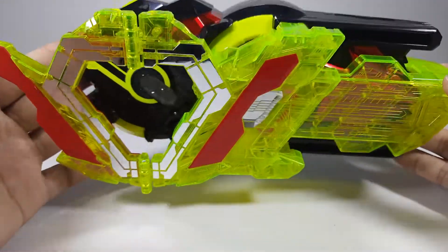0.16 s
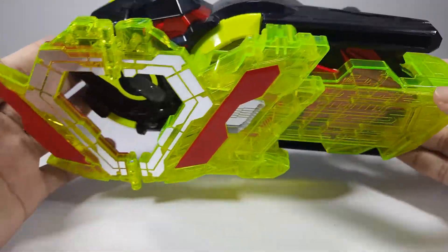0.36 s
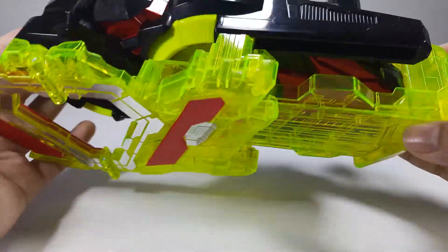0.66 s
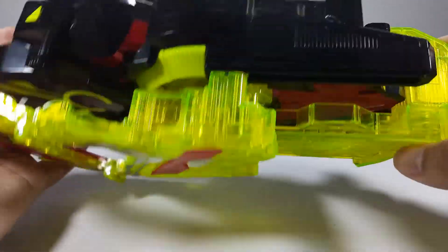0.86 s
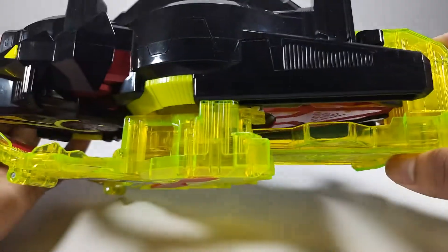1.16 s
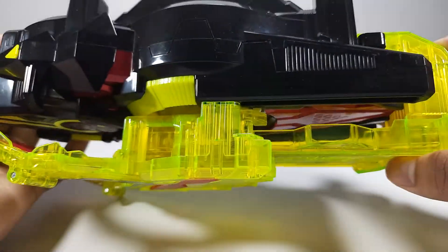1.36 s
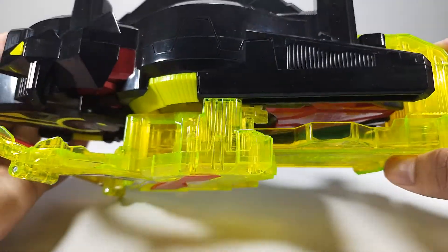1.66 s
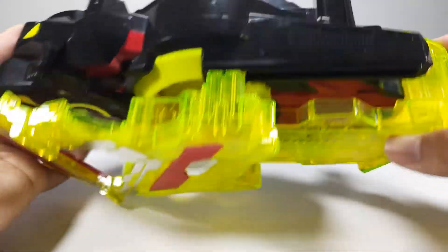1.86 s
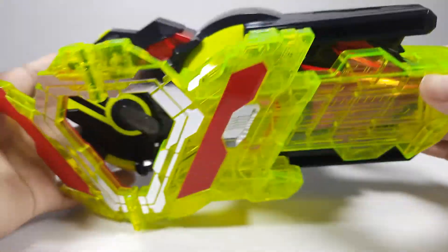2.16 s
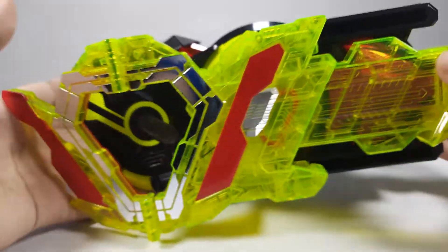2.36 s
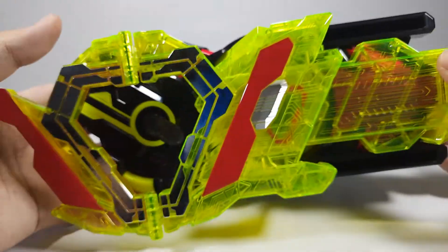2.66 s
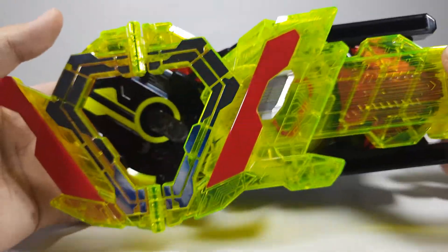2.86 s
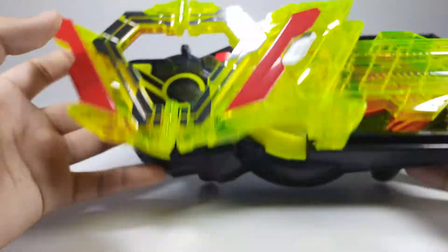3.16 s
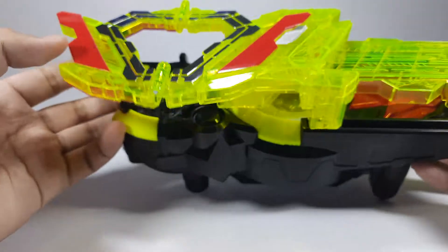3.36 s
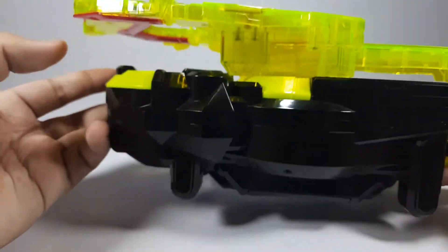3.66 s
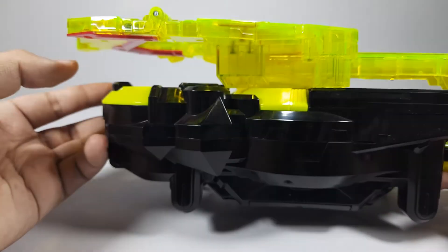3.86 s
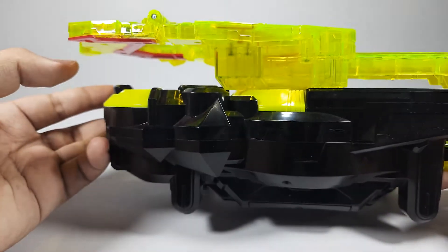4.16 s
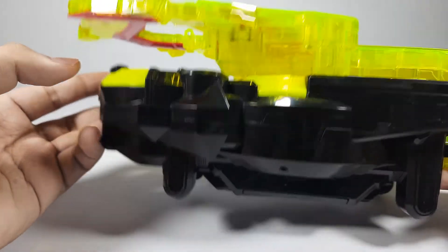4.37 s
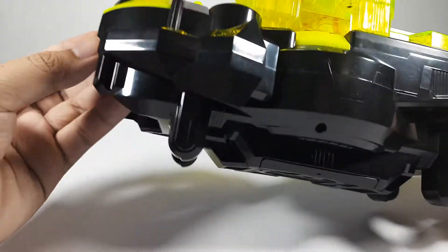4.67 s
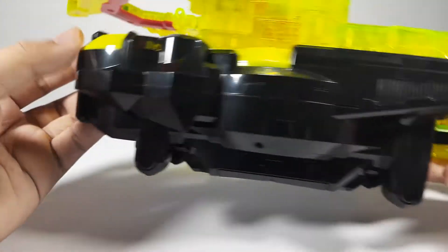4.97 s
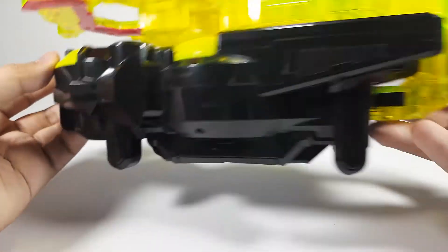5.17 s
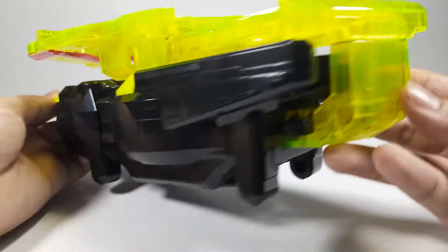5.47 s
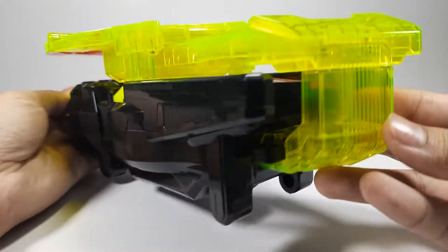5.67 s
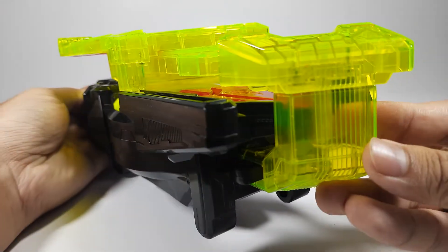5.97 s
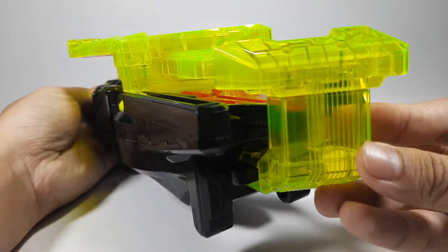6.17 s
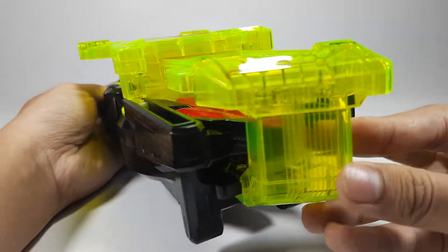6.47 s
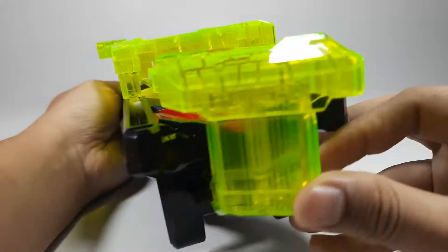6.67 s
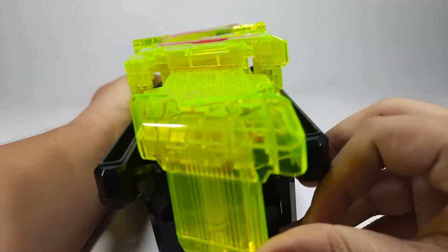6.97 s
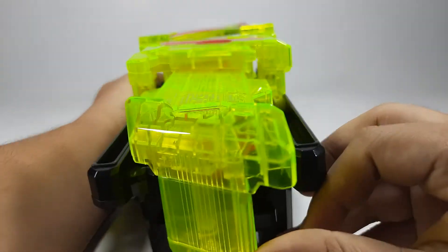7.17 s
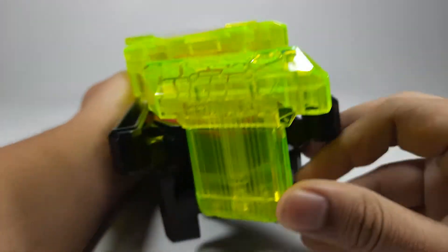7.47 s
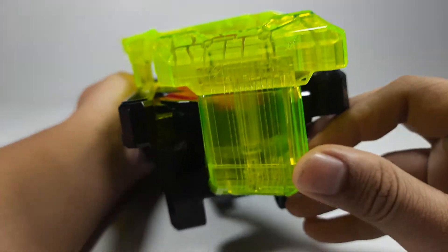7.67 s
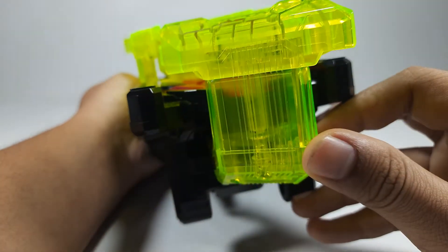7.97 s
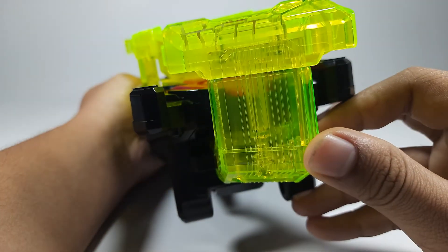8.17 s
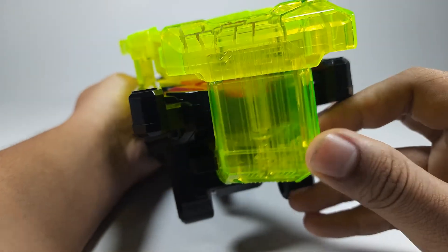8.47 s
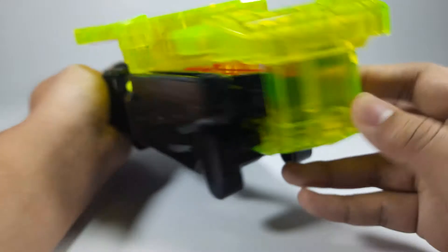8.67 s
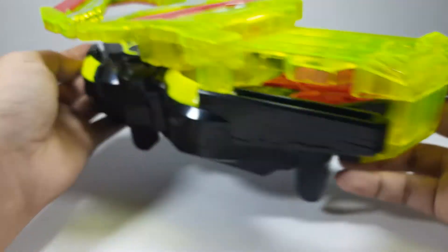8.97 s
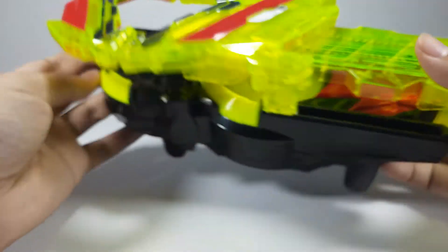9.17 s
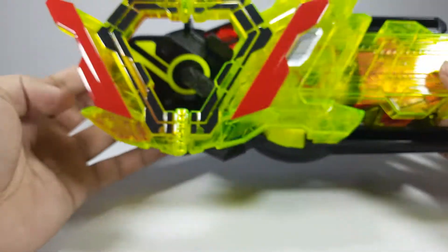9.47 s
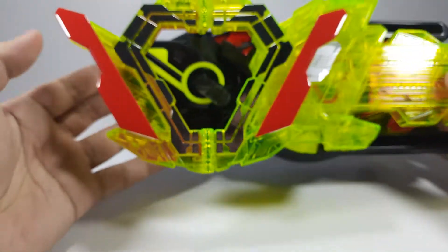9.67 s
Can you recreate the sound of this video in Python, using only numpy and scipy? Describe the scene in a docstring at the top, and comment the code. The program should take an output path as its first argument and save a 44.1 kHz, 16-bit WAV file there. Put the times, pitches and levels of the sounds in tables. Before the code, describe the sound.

A hollow plastic toy buckle is turned by hand just above a table in a small room, close to a stereo microphone. A tight cluster of sharp clacks comes near one second, a harder snap after two and a half, then light taps, a dull table thud, soft hissing slides and a final run of small rattly clicks. Low rumble and faint hiss remain beneath.

```python
"""Clicks and clacks of a hollow plastic toy belt buckle, turned by hand just above a table, near a camera.
Its shell, ribs and loose parts ring as decaying modes with noise cracks; table bumps are low decaying modes.
Shaped noise with tiny slips makes the sliding hiss and soft rubbing; resonances turn finger drag into squeaks.
The two microphones also pick up a short room tail, a low rumble, a faint hum and air hiss."""
import sys
import numpy as np
from scipy import signal
from scipy.fft import rfft, irfft, next_fast_len
from scipy.io import wavfile
from scipy.ndimage import map_coordinates

SR = 44100
rng = np.random.default_rng(int(sys.argv[2]) if len(sys.argv) > 2 else 0)


def to_wav(s):
    """Save 16-bit WAV."""
    ch = np.atleast_2d(s).T  # columns
    pcm = np.round(np.clip(ch, -1, 1) * 32767)  # PCM
    wavfile.write(sys.argv[1], SR, pcm.astype(np.int16))


N = 432621


def amp(db):
    """Decibels to gain."""
    return 10 ** (np.asarray(db) / 20)


def unit(x):
    """Scaled to rms 1."""
    return x / np.sqrt(np.mean(x ** 2) + 1e-20)


def struck(x):
    """Scaled so that the first 10 ms have rms 1."""
    return x / np.sqrt(np.mean(x[:, :SR // 100] ** 2))


def along(points, hz):
    """(Hz, value) points read on a log frequency axis."""
    f, v = np.transpose(points)
    return np.interp(np.log(hz + 1), np.log(f + 1), v)


def wobble(rate, n=N):
    """A smooth random curve of n samples, rate knots a second."""
    knots = rng.standard_normal(int(N * rate / SR) + 4)
    return map_coordinates(knots, [np.arange(n) * rate / SR])


def filtered(x, response):
    """x times a complex response of frequency."""
    n = x.shape[-1]
    m = next_fast_len(n + n // 8)
    return irfft(rfft(x, m) * response(np.fft.rfftfreq(m, 1 / SR)), m)[..., :n]


def band(x, lo_hz, hi_hz):
    """Causal band-pass."""
    edges_hz = [lo_hz, min(hi_hz, SR / 2 - 1)]
    return signal.sosfilt(signal.butter(N=3, Wn=edges_hz, btype="band", fs=SR, output="sos"), x)


def placed(pan_db):
    """Left and right gains for a level difference; positive is louder on the left."""
    return unit(amp([[pan_db / 2], [-pan_db / 2]]))


def left_first(x, lead_s):
    """The right microphone hears the sound lead_s after the left."""
    return filtered(x, lambda hz: np.exp(-2j * np.pi * np.outer([0, lead_s], hz)))


def pair(n, width):
    """Stereo white noise; width 0 is mono, 1 unrelated."""
    mid, side = rng.standard_normal((2, n))
    return np.array([mid + width * side, mid - width * side])


def add(track, start_s, sound):
    """Mixes a sound into the track at start_s."""
    part = track[:, round(start_s * SR):][:, :sound.shape[1]]
    part += sound[:, :part.shape[1]]


# spectrum of the low rumble: frequency_hz, relative_level_db_per_hz
RUMBLE_SPECTRUM = [(25, -25), (50, -9), (75, -5), (95, 3.5), (120, -9), (146, -4), (175, -13.5),
                   (220, -8.5), (255, -14), (290, -11), (400, -16), (600, -23), (900, -40), (1600, -53)]
RUMBLE_DB, RUMBLE_LEAD_S = -64, 0.00051  # the left microphone hears the room rumble and hum first
HUM_HZ, HUM_DB = 145, -72.5
HEFT_DB = 7.5  # low handling rumble over the hollow rub


def rumble(handling):
    """A deep room rumble and wavering hum lean left; the heavy toy adds low rumble as it shifts."""
    deep = lambda: unit(filtered(pair(N, 0.46), lambda hz: amp(along(RUMBLE_SPECTRUM, hz))))
    hum = np.sqrt(2) * np.sin(2 * np.pi * HUM_HZ * np.arange(N) / SR + 0.9 * wobble(5.1))
    steady = amp(RUMBLE_DB + 1.2 * wobble(4.7)) * deep() + amp(HUM_DB + 1.3 * wobble(6.4)) * hum
    heft = amp(HEFT_DB) * handling * deep()
    return placed(5.7) * left_first(steady, RUMBLE_LEAD_S) + heft


# spectrum of the background hiss: frequency_hz, relative_level_db_per_hz
AIR_SPECTRUM = [(400, -4), (700, 5), (1400, 0.5), (2500, -3.5), (6000, -13), (9000, -6.5), (12500, -13.5),
                (13500, -23.5), (15800, -31.5)]
AIR_DB = -80.5


def air():
    """The faint steady hiss of room and microphone is shaped noise."""
    hiss = unit(filtered(pair(N, 1.0), lambda hz: amp(along(AIR_SPECTRUM, hz))))
    return placed(2.3) * amp(AIR_DB) * hiss


def scuff(centre_hz, rise_s):
    """The parts graze each other for a moment before they meet: a narrow noise swelling to the hit."""
    t = np.arange(SR // 25) / SR
    grain = band(pair(len(t), 0.41), centre_hz * 1.0, centre_hz * 1.2)
    return unit(grain) * np.exp(-t[::-1] / rise_s)


# hollow shell modes, before the grip detunes them: frequency_hz, relative_level_db, t60_s, relative_linger_db
SHELL_MODES = [(437, -5, 0.11, -27.5), (590, 3, 0.015, -20), (698, -4.5, 0.062, -34),
               (770, -5.5, 0.04, -27.5), (1122, -2, 0.039, -32), (1202.6, -7, 0.045, -38),
               (1337, 4, 0.017, -37), (1560, -6.5, 0.016, -30.5), (1793, -3.5, 0.028, -32),
               (1980, -3.5, 0.023, -31.5), (2330, -8.5, 0.016, -26.5)]
GRIP_DETUNE = 0.068  # octaves: a light touch finds the modes shifted by the grip


def shell_knock(t, centre_hz, lead_s, sustain_db, focus_db, scatter_db, spread, clatter_db, detune):
    """The place of contact decides which modes of the hollow shell ring most."""
    hz, db, t60, linger_db = np.transpose(SHELL_MODES)[:, :, None]
    size, phase, skew, bend = rng.standard_normal((4, len(SHELL_MODES), 1))
    hz = hz * 2 ** (detune * bend)
    strength = amp(db + scatter_db * size - focus_db * np.log2(hz / centre_hz) ** 2)
    linger = amp(linger_db + sustain_db - 60 * t / .3)
    ring = strength * (amp(-60 * t / t60) + linger)
    angle = 2 * np.pi * hz * t + np.pi * phase
    # the nearer microphone hears it first; short waves differ most
    shift = np.pi * hz * lead_s + spread * skew * (hz / 1000) ** 2
    modes = np.array([(ring * np.sin(angle + side * shift)).sum(0) for side in (1, -1)])
    clatter = band(pair(len(t), 0.12) * amp(-60 * t / 0.086), centre_hz * 0.57, centre_hz * 1.63)
    blow = (struck(modes) + amp(clatter_db) * struck(clatter)) * (1 - np.exp(-t / 0.0003))
    # a small shell radiates little bass
    return struck(band(blow, centre_hz * 0.24, 6000))


# stiff ribs and edges, before each contact detunes them: frequency_hz, width_hz, relative_level_db
RIB_MODES = [(2470, 520, -3), (3750, 170, -5), (4300, 390, -3.5), (5100, 590, -4), (6100, 400, -6),
             (7140, 220, -9), (7900, 390, -5), (8300, 500, 6.5), (11150, 300, -10), (13200, 880, -12)]
RIB_DETUNE = 0.025  # octaves: each place of contact finds the ribs a little shifted


def rib_crack(t, lo_hz, hi_hz, t60, after_db, after_t60, attack_s):
    """A hard edge snaps through the dense rib modes; a weaker buzz of loose parts follows."""
    decay = amp(-60 * t / t60) + amp(after_db - 60 * t / after_t60)
    shape = decay * (1 - np.exp(-t / attack_s))
    shift = 2 ** (RIB_DETUNE * rng.standard_normal())

    def ribs(f):
        """Resonances over a flat floor."""
        return 0.61 + sum(amp(db / 2) * 1j * f * w / ((c * shift) ** 2 - f * f + 1j * f * w)
                          for c, w, db in RIB_MODES)

    return struck(band(filtered(pair(len(t), 0.9) * shape, ribs), lo_hz, hi_hz))


# plastic contacts, levels relative within each layer:
# start_s, knock_db, clack_db, tick_db, knock_centre_hz, left_right_db
CONTACT_HITS = [(0.163, -61.5, -83, -94, 930, 3), (0.383, -47.5, -61, -68, 903, 3),
                (0.3915, -38, -47.5, -67.5, 1050, 2), (0.396, -37.5, -52, -66, 1550, 1),
                (0.641, -71.5, -86, -92, 1190, 7), (0.841, -48.5, -53, -70, 1300, 5),
                (0.85, -52, -62, -81, 850, 4), (0.886, -46.5, -68, -89, 610, 2),
                (0.904, -53, -57, -70, 1000, 4), (0.9469, -34.5, -30.5, -21, 1530, 3),
                (0.977, -35, -43, -61, 712, 1), (0.987, -43, -34.5, -57.5, 1400, 2),
                (0.993, -41, -43, -58.5, 1702, -0.5), (1.0023, -32, -42, -60, 945, -0.5),
                (1.014, -42, -48, -63.5, 1093, 1.5), (2.048, -64, -66, -67.5, 1140, 0),
                (2.262, -68.5, -89, -96, 1285, 2), (2.361, -65.5, -91, -95, 1266, 0),
                (2.597, -52.5, -56.5, -58, 1153, -4), (2.6045, -33.5, -34, -37.5, 1420, 0),
                (2.614, -34.5, -42.5, -57, 1200, -2.5), (2.633, -37, -50, -70, 1410, -4),
                (2.6371, -23.5, -40.5, -57, 1050, 1), (2.639, -29, -23, -37, 1240, -0.5),
                (2.646, -41, -53, -60, 1150, -3), (3.075, -67, -76, -76, 1200, 3.5),
                (3.083, -67, -75, -72, 1110, 5.5), (3.259, -36, -48.5, -45.5, 1200, 1.5),
                (3.2737, -34.5, -44, -52, 1113, 4.5), (3.329, -52, -56.5, -63.5, 1098, -6),
                (3.566, -47, -52, -63, 1566, -6), (3.626, -46, -62.5, -74.5, 1155, 2),
                (3.777, -68, -64.5, -74, 995, -3.5), (3.796, -48.5, -64.5, -79, 950, 3),
                (4.43, -53.5, -80, -91, 1115, 5), (4.469, -63.5, -90, -87, 765, 1),
                (4.507, -64, -86, -88, 1200, 0), (4.54, -59.5, -81, -89.5, 1200, -0.5),
                (4.568, -52.5, -71, -76, 1090, 2), (4.573, -63.5, -66, -76.5, 1300, 4),
                (4.646, -52.5, -78.5, -83.5, 978, 2), (4.826, -68.5, -90, -95.5, 892, 3.5),
                (4.942, -60.5, -83.5, -89, 790, 4.5), (5.026, -74.5, -76.5, -82, 1515, 2.5),
                (5.156, -82.5, -83.5, -80, 1484, 2.5), (5.28, -70, -69, -78.5, 1510, 2.5),
                (5.302, -57.5, -58, -82.5, 1190, 3), (5.372, -52.5, -65, -67.5, 1470, 4),
                (5.4, -51.5, -63, -74, 930, 6), (5.43, -51, -49, -60, 826, 15),
                (5.437, -35, -47.5, -51.5, 714, 0.5), (5.44, -42, -50, -58, 1350, 2),
                (5.446, -43.5, -49, -56, 900, -1), (5.573, -52.5, -55, -79.5, 730, 2),
                (5.646, -51.5, -50.5, -64.5, 850, 6), (5.653, -51.5, -63, -73, 1000, 1.5),
                (5.768, -53.5, -81.5, -70, 596, 8), (5.789, -54, -72, -60.5, 727, 3),
                (5.828, -46.5, -47.5, -51, 630, 1), (6.76, -47.5, -53, -66, 1260, 6),
                (7.238, -48.5, -87, -106, 1250, 10), (7.352, -61, -79.5, -89, 1170, -4.5),
                (7.489, -65, -83.5, -97, 1350, 6), (7.978, -70.5, -92.5, -97.5, 1405, 3.5),
                (8.56, -48.5, -56, -79.5, 1080, 0.5), (8.594, -58, -77, -86, 870, 4.5),
                (8.648, -66.5, -76, -84, 1254, -7), (8.717, -36, -45.5, -63, 1240, -0.5),
                (8.738, -38, -44, -52, 1053, 5.5), (8.758, -46, -45.5, -70, 1190, -4.5),
                (8.769, -48, -58, -70, 900, 2), (8.869, -48.5, -62, -67, 1060, 3),
                (8.884, -59, -69, -77, 757, 7), (8.924, -53, -61, -72, 1120, 1.5),
                (9.046, -52, -48.5, -57, 1100, 0), (9.0529, -45.5, -65, -65, 990, 1),
                (9.194, -46.5, -51.5, -69, 1600, -1), (9.254, -49.5, -63.5, -66, 995, 3),
                (9.287, -53.5, -71, -82.5, 1252, -6.5), (9.313, -66, -74, -82.5, 1520, -4),
                (9.356, -52.5, -71.5, -77.5, 850, 2.5), (9.388, -50, -73.5, -88, 1000, 2),
                (9.511, -58, -64, -66.5, 1210, -0.5), (9.532, -52.5, -59.5, -77, 1234, -2.5),
                (9.541, -50, -63, -72, 1100, 1), (9.576, -60, -62.5, -69, 988, 2.5),
                (9.642, -66, -67, -66, 730, 2), (9.704, -61.5, -64, -68.5, 706, 2),
                (9.755, -67, -66.5, -81.5, 622, -4.5)]
FIRM_DB = -37.5  # knocks above this level ring the shell more fully
TICK_LEAD_S = 0.0003  # the left microphone hears the edge tick first


def contacts():
    """Each contact is a short scuff, then a mix of shell knock, clack and bright tick."""
    out, t = np.zeros((2, N)), np.arange(SR // 4) / SR
    brief = t[:SR // 10]
    for start_s, knock_db, clack_db, tick_db, centre_hz, pan_db in CONTACT_HITS:
        # a firm blow rings the shell cleanly and long, a light touch mostly clatters
        firmness = max(0, knock_db - FIRM_DB)
        knock = shell_knock(t, centre_hz, lead_s=pan_db * .00004, sustain_db=min(0, firmness - 14),
                            focus_db=max(0, 6.5 - 0.13 * firmness), scatter_db=2.0, spread=0.33,
                            clatter_db=-7 - 0.33 * firmness, detune=GRIP_DETUNE / (1 + firmness))
        clack = rib_crack(brief, lo_hz=2178.4, hi_hz=7100, t60=0.035,
                          after_db=-19.0, after_t60=0.084, attack_s=0.00085)
        # a tick strong against its knock reaches higher
        tick_top_hz = np.interp(tick_db - knock_db, [-24, -6], [10000, 14900])
        tick = rib_crack(brief, lo_hz=5230, hi_hz=tick_top_hz, t60=0.012,
                         after_db=-30, after_t60=0.028, attack_s=0.00041)
        # a soft contact cannot excite the top of the clack
        soft_hz = 7500 * amp(min(0, tick_db - clack_db + 11.5) / 2.1)
        clack = struck(band(clack, 300, max(soft_hz, 1500)))
        crack = amp(clack_db - 4.5) * clack
        crack = crack + placed(0.89) * amp(tick_db - 0.16) * left_first(tick, TICK_LEAD_S)
        # a catch that snaps has less run-up
        graze_db = knock_db - 18.0 - max(0, tick_db - knock_db)
        graze = amp(graze_db) * scuff(centre_hz, rise_s=0.0049)
        add(out, start_s, placed(pan_db) * amp(knock_db - 3.5) * knock)
        add(out, start_s, placed(pan_db) * crack)
        add(out, start_s - graze.shape[1] / SR, graze)
    return out


# decay of the small room: frequency_hz, t60_s
ROOM_DECAY = [(150, 0.64), (600, 0.26), (2000, 0.24), (4200, 0.31), (9000, 0.23), (15000, 0.32)]
# tone of the small room: frequency_hz, relative_level_db
ROOM_TONE = [(150, -8), (600, -1), (1300, -3), (2700, 0), (5000, -3.5), (7000, -5), (10000, -6.5),
             (15000, -8.5)]


def room(x):
    """The walls answer in a tail that swells within a few ms; each frequency dies at its own speed."""
    hz, t, z = signal.stft(rng.standard_normal((2, SR // 2)), SR, nperseg=256)
    tail = signal.istft(z * amp(-60 * t / along(ROOM_DECAY, hz)[:, None]), SR, nperseg=256)[1]
    tail = tail * (1 - np.exp(-(np.arange(tail.shape[1]) / SR / 0.0013) ** 2))
    mid, side = filtered(tail / np.linalg.norm(tail[0]), lambda f: amp(along(ROOM_TONE, f)))
    # long waves reach both microphones alike
    side = filtered(side, lambda f: f / np.hypot(f, 1100))
    walls = np.array([mid + side, mid - side]) / np.sqrt(2)
    return signal.fftconvolve(x, walls, axes=1)[:, :N]


# the toy slides through the hands, one row a movement, levels relative within each layer:
# start_s, speeding_up_s, slowing_down_s, hiss_db, scrape_db, hollow_rub_db
MOVEMENTS = [(0.3, 0.077, 0.76, -87, -91, -83), (0.76, 0.14, 0.12, -79.5, -76, -71.5),
             (0.955, 0.037, 0.12, -70.5, -54, -73.5), (1.8, 0.072, 0.13, -86.5, -84, -82.5),
             (2.0, 0.06, 0.1, -79, -84, -84), (2.62, 0.12, 0.52, -94, -91.5, -74.5),
             (3.04, 0.055, 0.12, -84, -85.5, -72), (3.14, 0.13, 1, -93, -83.5, -71),
             (4.4, 0.16, 0.17, -83.5, -82, -86), (5.08, 0.15, 0.25, -88.5, -95, -84),
             (5.26, 0.055, 0.16, -92, -82.5, -73.5), (5.42, 0.077, 0.11, -69, -62.5, -58.5),
             (5.36, 0.12, 0.71, -65.5, -72, -65), (5.5, 0.58, 1.0, -73, -90.5, -87),
             (6.379, 0.35, 0.53, -61.5, -69.5, -78.5), (6.74, 0.056, 0.67, -88.5, -76.5, -73),
             (7.37, 0.1, 0.56, -82.5, -85.5, -81.5), (8.44, 0.2, 0.39, -73.5, -77.5, -71),
             (8.65, 0.079, 0.88, -61.5, -62.5, -65.5), (9.0, 0.13, 0.37, -91.5, -70, -75.5),
             (9.49, 0.028, 0.32, -79.5, -74, -66), (9.6, 0.18, 0.16, -73.5, -77, -73.5)]


def sliding_gain(levels_db, power):
    """Each movement speeds up and slows down smoothly; friction follows a power of its speed."""
    t, energy = np.arange(N) / SR, np.zeros(N)
    for (start, rise, fall, *_), db in zip(MOVEMENTS, levels_db):
        now = (t > start) & (t < start + rise + fall)
        ramp = np.interp(t[now] - start, [0, rise, rise + fall], [0, 1, 0])
        speed = np.sin(np.pi / 2 * ramp)
        energy[now] += (amp(db) * speed ** power) ** 2
    return np.sqrt(energy)


def friction(spectrum, width, slips_per_s, slip_db):
    """Friction of rms 1: a smooth rush with tiny slips scattered on it."""
    slips = (rng.random(N) < slips_per_s / SR) * rng.standard_normal((2, N))
    rush = pair(N, width)
    return unit(filtered(rush + amp(slip_db) * unit(slips), lambda hz: amp(along(spectrum, hz))))


# spectrum of the fine sliding hiss: frequency_hz, relative_level_db_per_hz
HISS_SPECTRUM = [(2500, -30.5), (4500, -12), (7000, -4), (9000, -3), (12500, -0.5), (15800, -3.5)]
# spectrum of the coarse scrape: frequency_hz, relative_level_db_per_hz
SCRAPE_SPECTRUM = [(900, -26.5), (2000, -3.5), (3200, -1.5), (5000, -3), (7000, -6), (11000, -18.5)]
HISS_POWER, SCRAPE_POWER = 3.1, 2.8  # exponents of speed


def sliding():
    """Plastic slides over skin and table: a fine hiss with a coarser scrape, both rising with speed."""
    *_, hiss_db, scrape_db, _ = np.transpose(MOVEMENTS)
    hiss_gain = sliding_gain(hiss_db, HISS_POWER) * amp(7.0)
    hiss = hiss_gain * friction(HISS_SPECTRUM, width=.85, slips_per_s=900, slip_db=-16.0)
    scrape_gain = sliding_gain(scrape_db, SCRAPE_POWER) * amp(4.5 + 0.73 * wobble(21))
    scrape = scrape_gain * friction(SCRAPE_SPECTRUM, width=1.0, slips_per_s=310, slip_db=-9.5)
    return placed(3.3) * hiss + placed(6.2) * scrape


# spectrum of the rubbed hollow shell: frequency_hz, relative_level_db_per_hz
RUB_SPECTRUM = [(290, -40), (500, -7), (543, -10.5), (673, -4.5), (731, -4.5), (990, -6), (1130, -4),
                (1250, -12), (1390, -4), (1520, -11), (1790, -10), (2130, -21), (2600, -15.5),
                (3380, -44.5), (5720, -120)]
RUB_POWER = 2.2  # exponent of speed


def rubbing(handling):
    """The hands brush softly on the shell as it turns: hollow friction with a fluttering level."""
    flutter = amp(1.3 * wobble(45))
    rub = friction(RUB_SPECTRUM, width=1.0, slips_per_s=56, slip_db=-6.0)
    return placed(4.3) * handling * flutter * rub


RATTLE_DB, RATTLE_SCATTER_DB = 4, 3  # least level over the hollow rub, random extra up to


def rattle(handling, count):
    """Loose parts knock faintly at random moments, as hard as the toy is being moved."""
    out, t = np.zeros((2, N)), np.arange(SR // 25) / SR
    for when, size, place in rng.random((count, 3)):
        gain = handling[int(when * N)] * amp(RATTLE_DB + RATTLE_SCATTER_DB * size)
        knock = shell_knock(t, 650 * 3.4 ** place, lead_s=0, sustain_db=-15, focus_db=5.5,
                            scatter_db=4.0, spread=0.44, clatter_db=-7.5, detune=GRIP_DETUNE)
        add(out, when * N / SR, gain * knock)
    return placed(2.5) * out


# hinged and loose parts knock home: start_s, pitch_hz, level_db, t60_s
LOOSE_PARTS = [(0.393, 553, -45, 0.061), (0.9472, 1670, -36, 0.014), (0.9481, 4280, -37.5, 0.015),
               (0.983, 405, -34.5, 0.035), (1.0025, 730, -31, 0.036), (2.604, 1600, -40.5, .016),
               (2.606, 580, -48, 0.06), (2.637, 597, -26, 0.05), (2.639, 1330, -22, 0.016),
               (2.64, 1110, -27.5, 0.016), (3.26, 5130, -54.5, 0.031), (3.273, 970, -45, 0.02),
               (3.568, 1950, -53, 0.054), (3.627, 1105, -53.5, 0.034), (4.471, 752, -59.5, .05),
               (5.438, 1730, -48, .018), (5.438, 2530, -50, 0.018), (5.651, 478, -50.5, 0.051),
               (5.775, 460, -57, .05), (5.828, 760, -53.5, 0.048), (5.835, 477, -49.5, 0.04),
               (6.761, 930, -57, 0.11), (7.238, 697, -54.5, 0.07), (7.238, 1110, -52.5, 0.028),
               (7.238, 1860, -55, 0.025), (8.719, 921, -45.5, 0.12), (8.757, 3300, -50.5, 0.019),
               (9.053, 1192, -47, .04), (9.195, 2150, -54, 0.035), (9.357, 720, -59, .05),
               (9.389, 681, -56, .055), (9.533, 1473, -55.5, 0.059), (9.534, 5650, -67.5, 0.027),
               (9.756, 2830, -73.5, 0.049)]
OVERTONE, OVERTONE_DB = 1.63, -13.5  # second mode: frequency ratio, level


def parts():
    """A loose part meets its stop and rings briefly in two modes, its pitch unsteady as it chatters."""
    out, t = np.zeros((2, N)), np.arange(SR // 6) / SR
    for start_s, hz, db, t60 in LOOSE_PARTS:
        chatter = 0.0062 * np.cumsum(rng.standard_normal((2, len(t))), axis=1)
        low, high = np.sin(2 * np.pi * hz * np.outer([1, OVERTONE], t) + chatter)
        fade = amp(-60 * t / t60)
        # the overtone dies twice as fast
        ring = (low * fade + amp(OVERTONE_DB) * high * fade ** 2) * (1 - np.exp(-t / .0008))
        add(out, start_s, placed(0.8) * amp(db) * struck(ring[None]))
    return out


# dull bumps on the table: start_s, relative_level_db, pitch_factor, t60_s
TABLE_BUMPS = [(0.948, -40.5, 0.93, 0.27), (0.948, -38, 3, 0.06), (0.983, -29.5, 2.82, 0.068),
               (1.002, -50.5, 3.2, 0.12), (0.991, -47.5, 0.85, 0.37), (2.643, -55, 1.64, 0.058),
               (3.263, -48, 1.9, 0.095), (3.793, -37.5, 0.95, 0.17), (3.81, -39, 1.37, 0.15),
               (3.826, -44, 2.83, 0.08), (3.845, -48, 1.8, 0.1), (5.436, -24, 0.94, 0.12),
               (5.453, -27.5, 0.9, 0.12), (5.503, -32.5, 0.857, 0.078), (7.122, -59.5, 2.1, 0.21),
               (9.579, -53.5, 2.5, 0.12), (9.618, -53.5, 2.5, 0.055), (9.643, -50.5, 1.9, .18),
               (9.703, -49.5, 2.1, 0.2), (9.754, -52, 2.3, 0.22)]
# table top modes, before the pitch factor: frequency_hz, relative_level_db
TABLE_MODES = [(68, -5.5), (86, -1.5), (103, 2.5), (128, -2), (188, -1.5), (340, -12)]


def bumps():
    """The weight of the toy lands and the table top booms briefly."""
    out, t = np.zeros((2, N)), np.arange(SR // 2) / SR
    for start_s, db, pitch, t60 in TABLE_BUMPS:
        boom = sum(amp(level) * np.sin(2 * np.pi * hz * pitch * t) for hz, level in TABLE_MODES)
        shape = amp(-60 * t / t60) * (1 - np.exp(-t / 0.0065))
        add(out, start_s, placed(1.0) * amp(db + 2.0) * unit(boom) * shape)
    return band(out, 62, 690)


# fingers shift their grip: start_s, length_s, scrape_db, squeak_db, squeak_hz
GRIP_STROKES = [(0.954, 0.064, -48, -46, 1710), (1.01, 0.13, -65, -67, 1700),
                (1.819, 0.16, -75.5, -84.5, 1820), (2.196, 0.33, -79, -79.5, 1450),
                (3.051, .1, -68.5, -82, 1800), (3.318, 0.19, -66, -75.5, 1645),
                (3.562, 0.071, -63, -60, 1870), (4.423, 0.19, -65.5, -74.5, 1730),
                (4.626, 0.076, -68.5, -77.5, 1800), (4.916, 0.11, -73.5, -79.5, 1738),
                (6.448, 0.17, -73.5, -69, 1740), (6.707, 0.46, -69.5, -66, 1824),
                (7.234, 0.14, -66, -75.5, 1880), (7.287, 0.26, -74.5, -71.5, 1930),
                (8.559, 0.075, -63.5, -84, 1870), (9.248, 0.12, -67, -71, 1745)]
# spectrum of the grainy grip scrape: frequency_hz, relative_level_db_per_hz
GRIP_SPECTRUM = [(350, -13), (560, 0.5), (700, 2.5), (880, -2), (1100, 0), (1350, -1), (1550, -7),
                 (1800, -13), (2300, -15.5), (3000, -27.5), (3800, -31), (9000, -38)]
# unsteady finger pressure: share of the pitch, level flutter
SQUEAK_WANDER, SQUEAK_ROUGH_DB = 0.022, 1.53
SQUEAK_UPPER, SQUEAK_UPPER_DB = 1.4, -17.5  # upper squeak resonance: frequency ratio, level


def strokes():
    """Skin sticks and slips on plastic: irregular catches sound the hollow, with a hoarse wavering squeak."""
    out = np.zeros((2, N))
    peak = lambda f, centre: (1 + 1j * 7.8 * (f / centre - centre / (f + 1))) ** -2
    for start_s, length_s, scrape_db, squeak_db, hz in GRIP_STROKES:
        n = int(length_s * SR)
        catches = (rng.random(n) < 220 / SR) * rng.standard_normal(n)
        drag = unit(catches) + amp(2.5) * pair(n, 1.0)
        scrape = unit(filtered(drag, lambda f: amp(along(GRIP_SPECTRUM, f))))
        hoarse = drag + amp(4.5) * pair(n, 0.99)
        resonance = lambda f: peak(f, hz) + amp(SQUEAK_UPPER_DB) * peak(f, hz * SQUEAK_UPPER)
        squeak = unit(filtered(hoarse, resonance))
        # reading at an uneven pace bends the pitch
        pace = np.cumsum(1 + SQUEAK_WANDER * wobble(11, n))
        squeak = np.array([np.interp(pace, np.arange(n), ear) for ear in squeak])
        pressure = amp(SQUEAK_ROUGH_DB * wobble(55, n)) * signal.windows.tukey(n, .7)
        stroke = amp(scrape_db) * scrape + amp(squeak_db) * squeak
        add(out, start_s, placed(9.9) * stroke * pressure)
    return out


# the close toy as the two microphones hear it, on top of each layer's own place:
# frequency_hz, left_right_db
MICROPHONE_LEAN = [(200, 1), (550, 1.5), (850, 1.5), (1200, -4), (1800, -0.5), (2700, -0.5), (4000, -4),
                   (6000, -5), (8000, -3.5), (10000, 7), (13000, 7.5)]


def scene():
    """The handled toy close to the two microphones, in its small room."""
    hits = contacts() + parts() + bumps()
    handling = sliding_gain(np.transpose(MOVEMENTS)[-1], RUB_POWER)
    hands = sliding() + rubbing(handling) + rattle(handling, count=90) + strokes()
    lean = lambda hz: amp(np.outer([.5, -.5], along(MICROPHONE_LEAN, hz)))
    even_lean = lambda hz: lean(hz) / np.sqrt(np.mean(lean(hz) ** 2, axis=0))
    toy = filtered(hits + amp(-5.0) * room(hits) + hands, even_lean)
    return toy + rumble(handling) + air()


TOP_HZ = 15400


def record(dry):
    """The camera rolls off steeply at its band limit."""
    return filtered(dry, lambda hz: 1 / np.sqrt(1 + (hz / TOP_HZ) ** 90))


dry = scene()
out = record(dry)
to_wav(out)
```